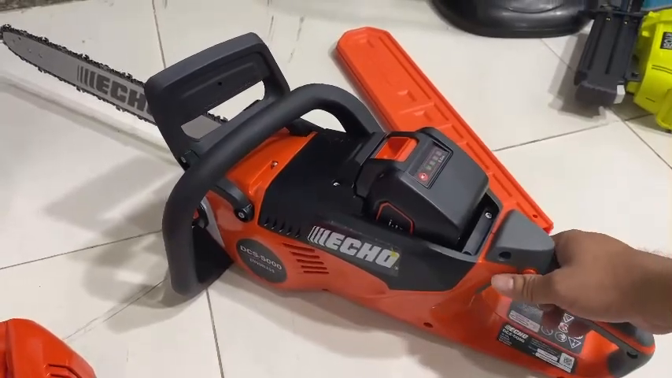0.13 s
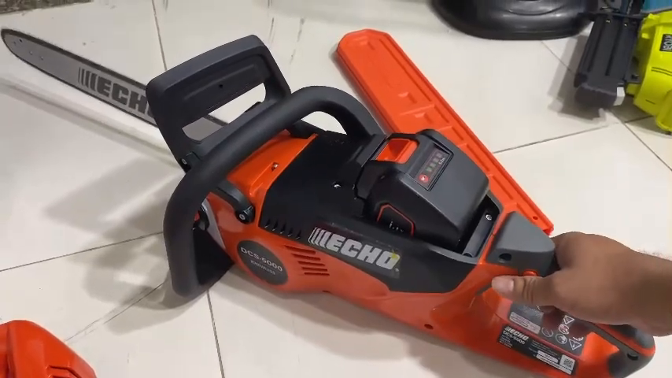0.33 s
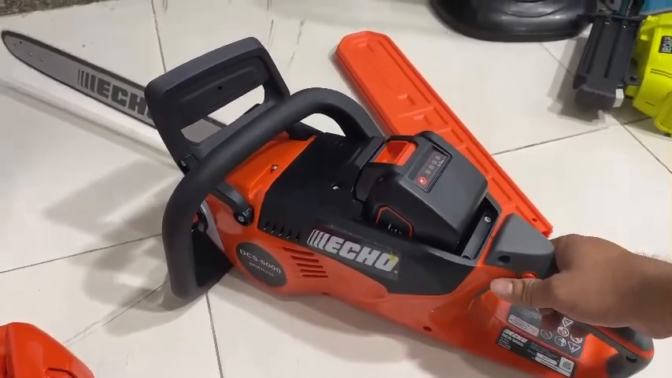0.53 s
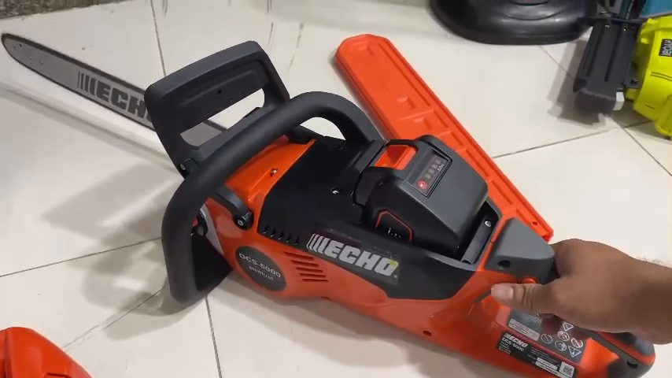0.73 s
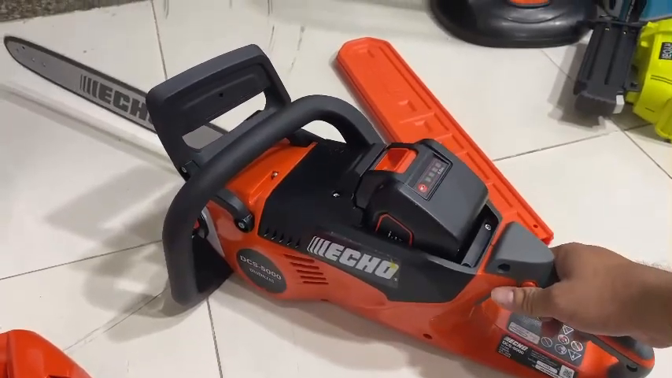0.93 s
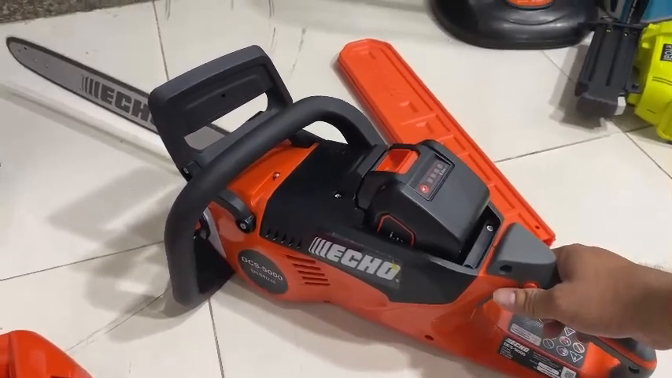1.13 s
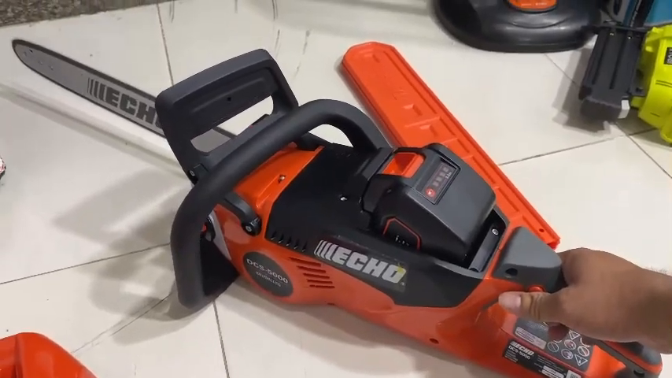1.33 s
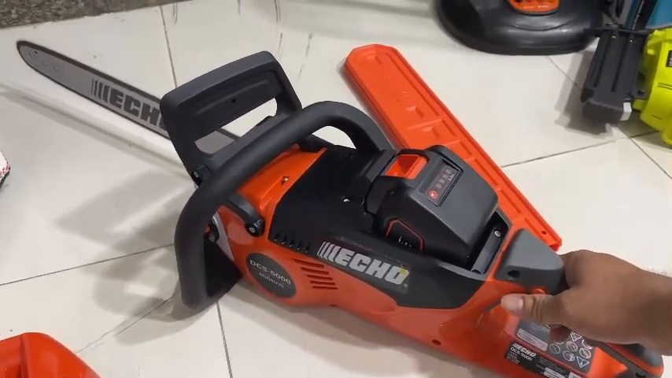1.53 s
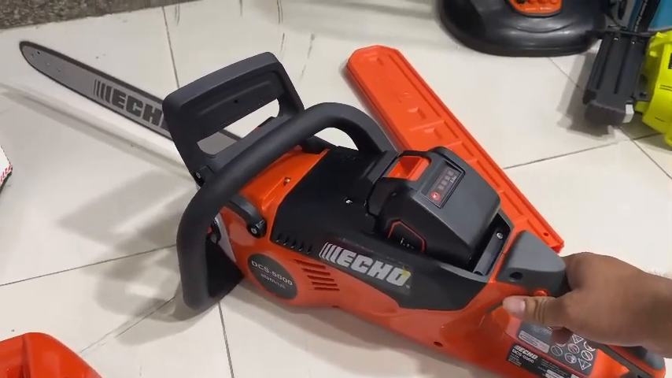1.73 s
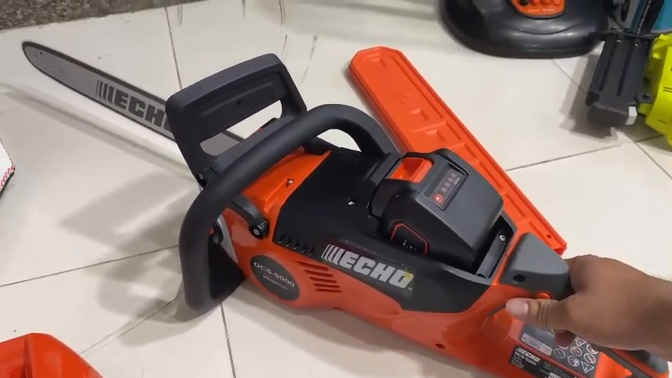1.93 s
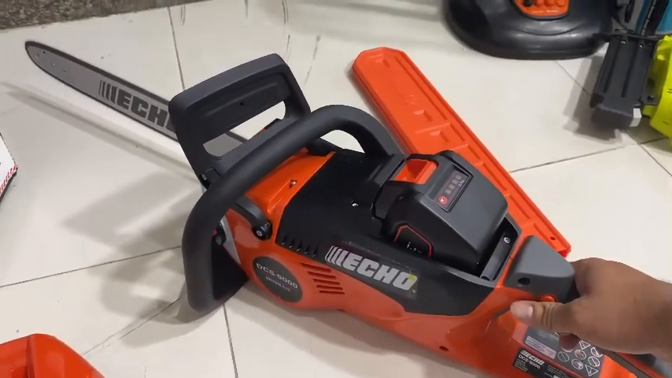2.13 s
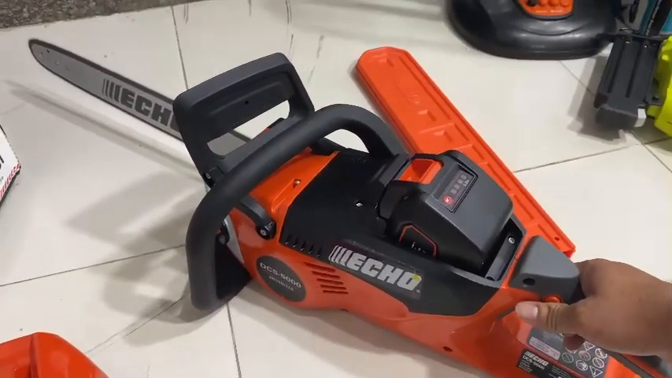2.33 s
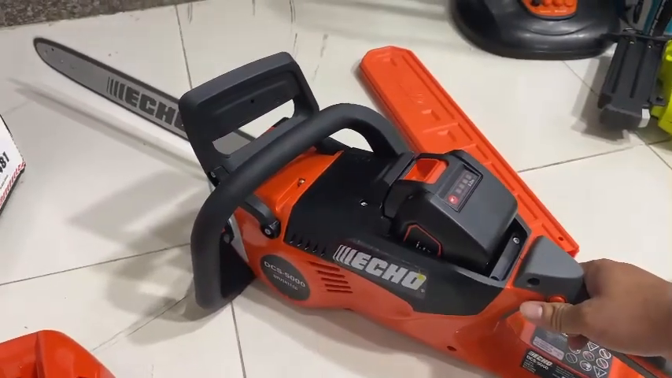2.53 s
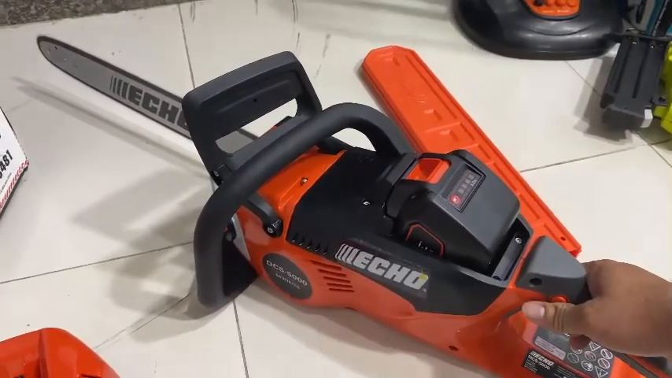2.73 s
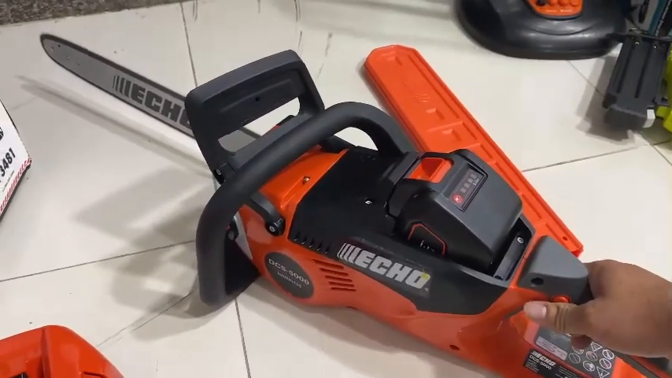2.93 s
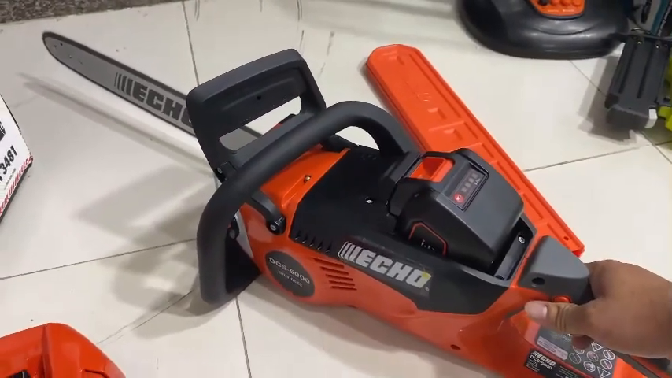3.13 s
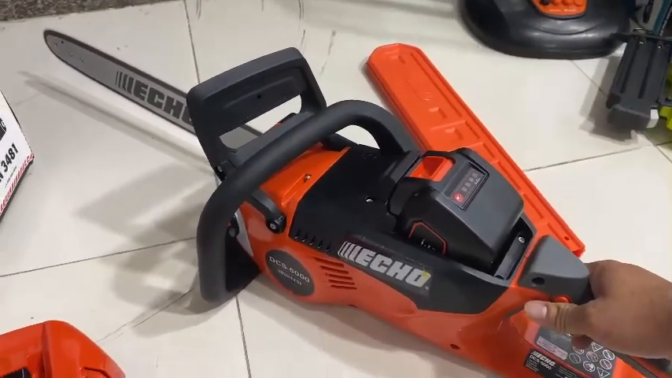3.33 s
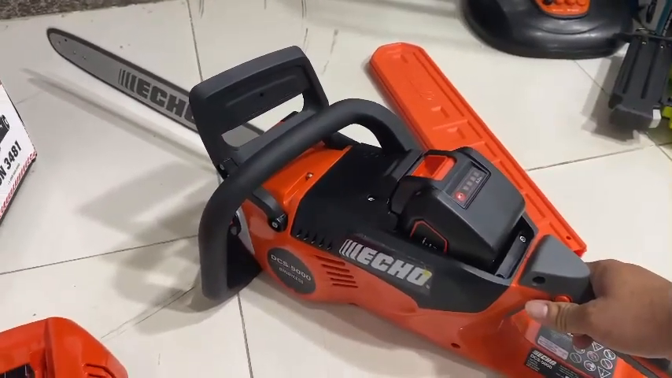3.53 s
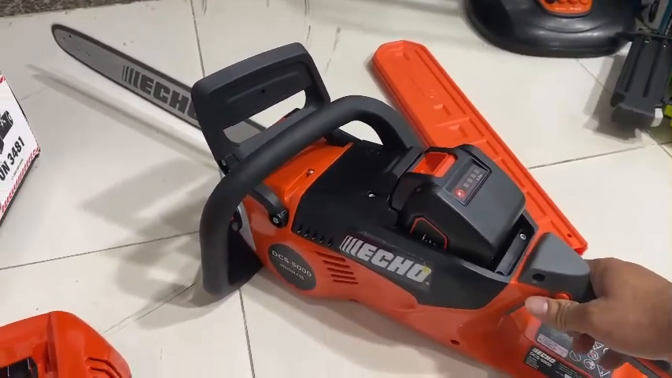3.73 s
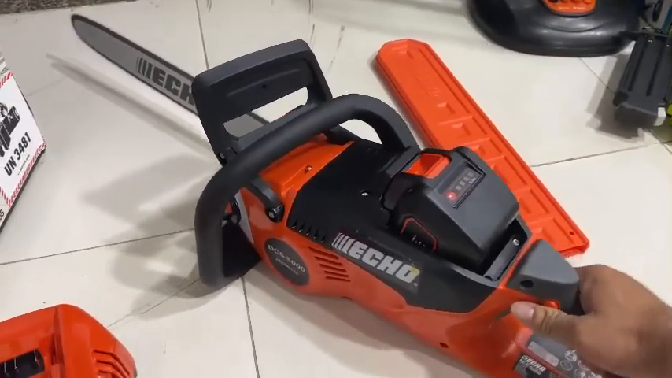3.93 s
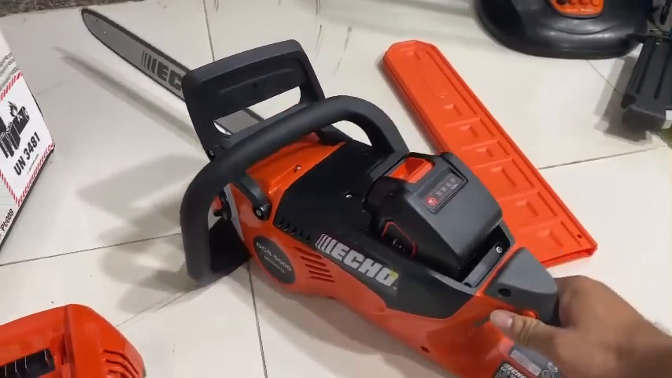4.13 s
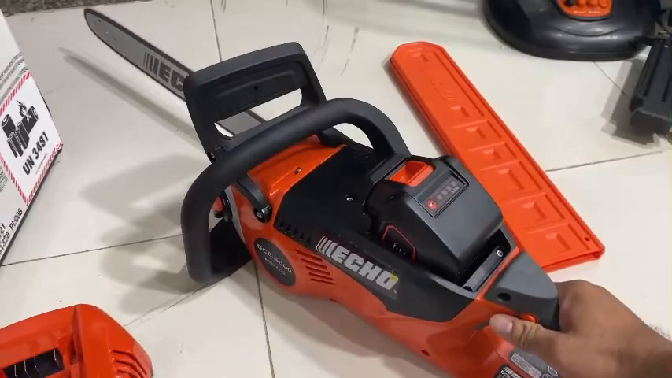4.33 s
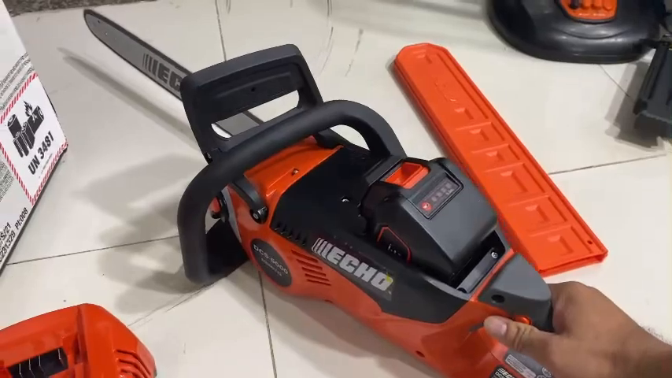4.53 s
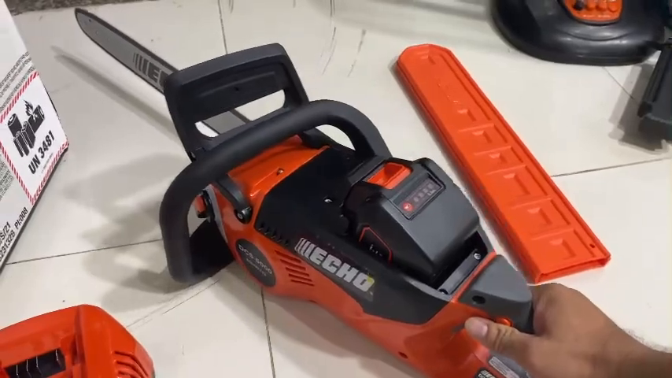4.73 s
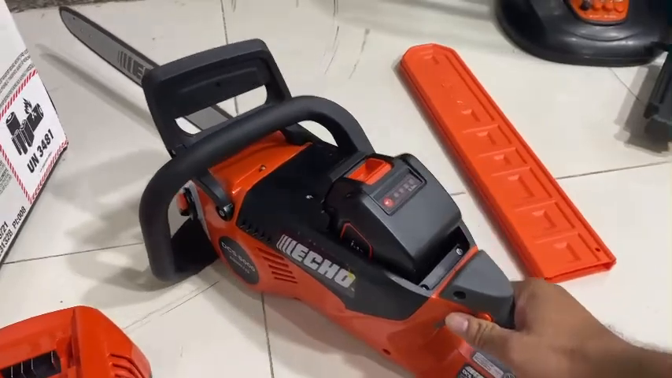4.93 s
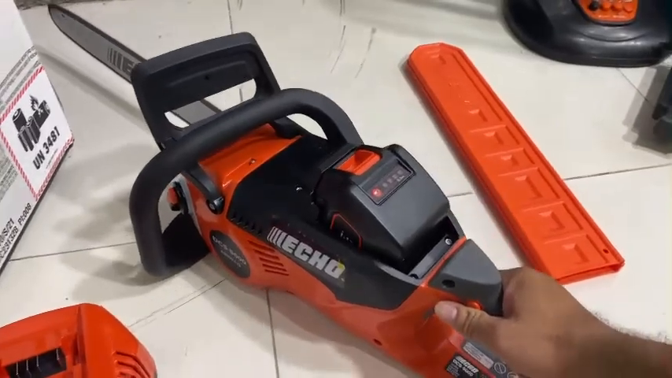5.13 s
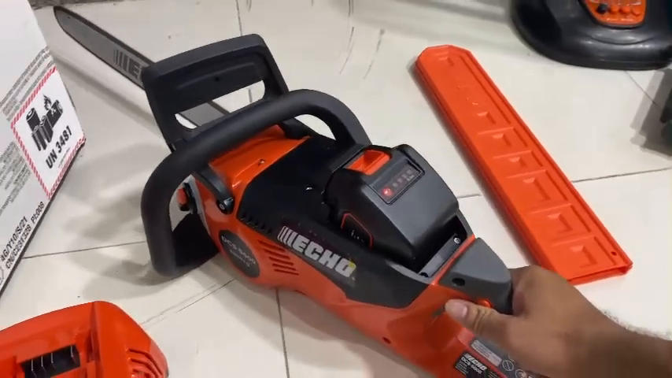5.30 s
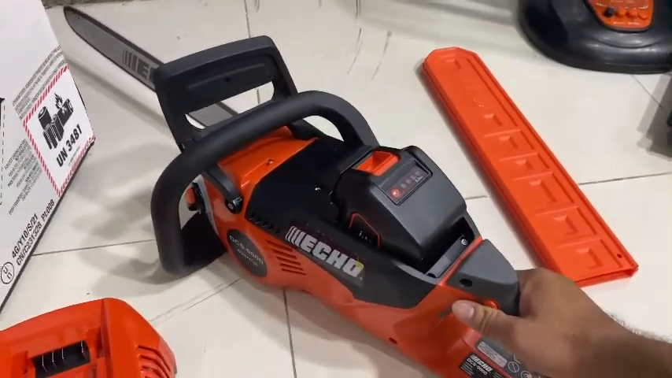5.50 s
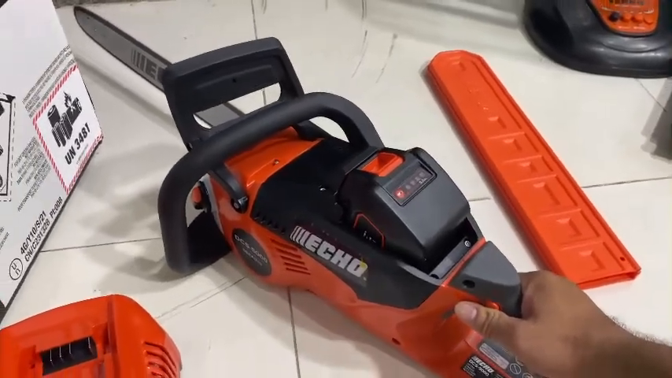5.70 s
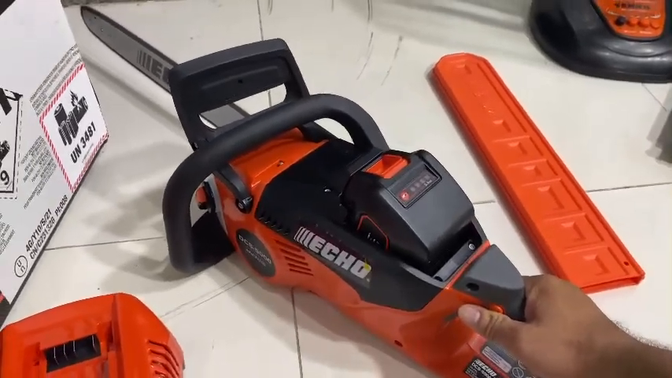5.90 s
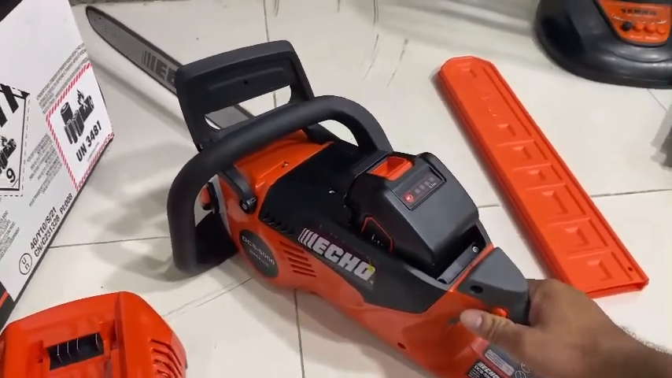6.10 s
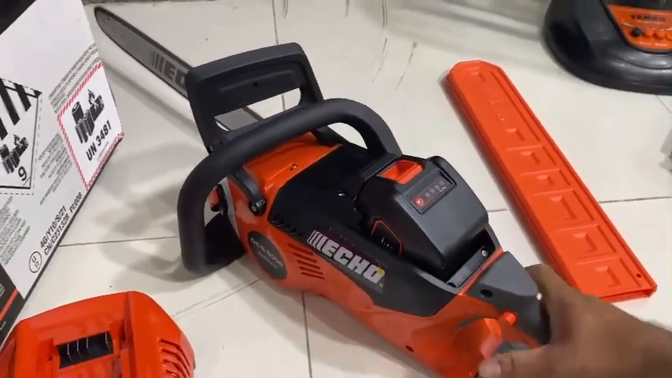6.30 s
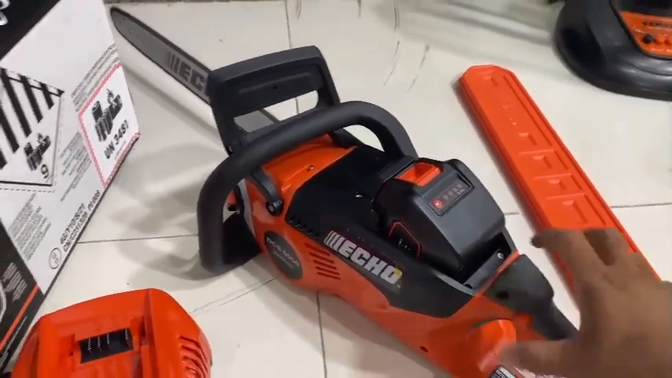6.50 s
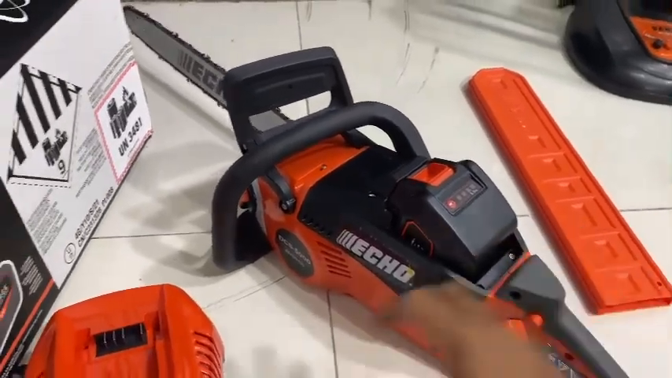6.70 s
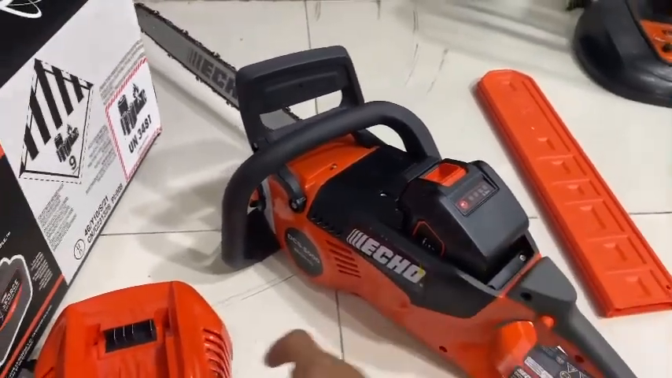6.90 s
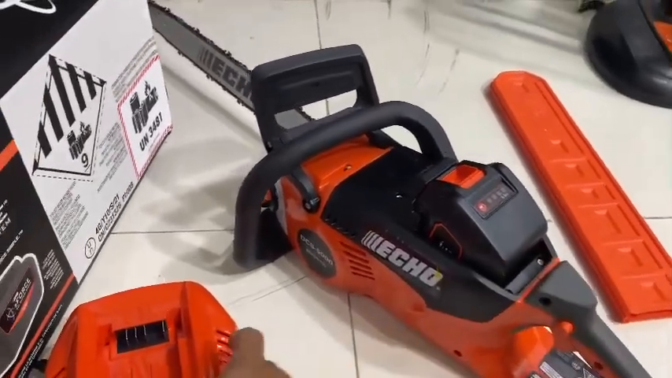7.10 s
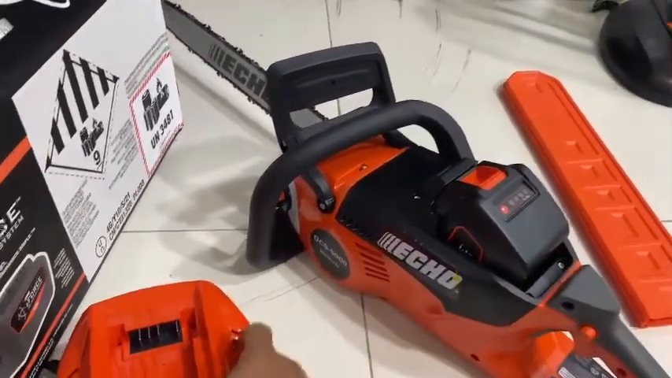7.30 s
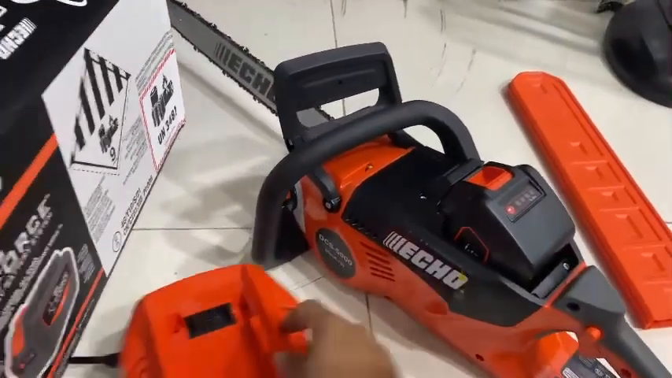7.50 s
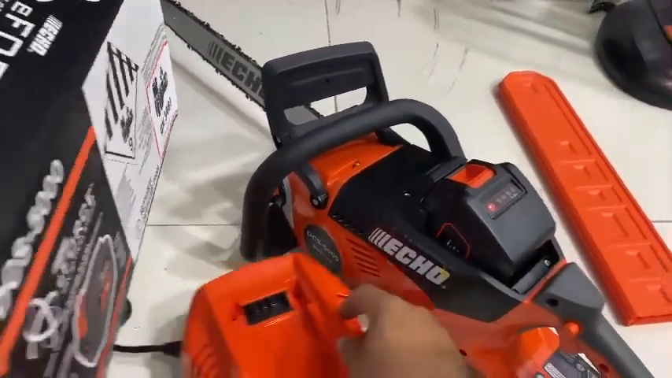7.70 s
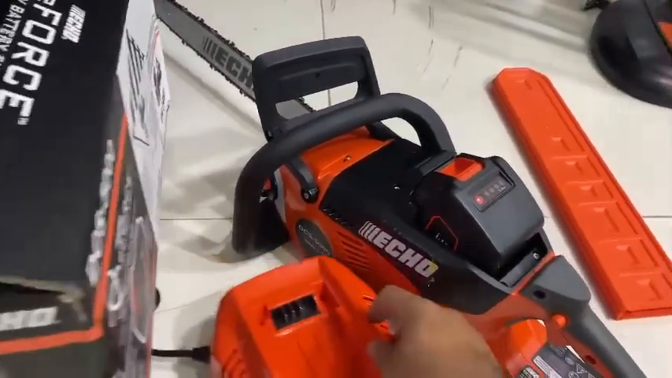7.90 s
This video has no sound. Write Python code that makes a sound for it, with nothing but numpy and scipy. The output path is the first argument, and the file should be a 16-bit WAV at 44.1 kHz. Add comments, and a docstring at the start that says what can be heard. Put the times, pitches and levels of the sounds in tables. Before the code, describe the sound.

Close up in a reflective tiled room, an electric saw motor rises from a click to a hard, buzzing whine near 870 hertz, wrapped in fast chain clatter and steel hiss. It holds without load, its tone colour shifting as the hand-held microphone moves around behind. Then the pitch falls for half a second, a brake cuts it off, the room rings briefly, and a plastic shell slides and thuds on tile.

```python
"""A battery chainsaw on a tiled floor spins up, runs free, coasts and brakes to a stop.
One shaft speed drives it all: sprocket whine and motor tones are sums of sines locked to shaft angle;
chain rattle and hiss are random impacts, and the shell's boom is noise, shaped by resonances.
The trigger clicks at the start; at the end a plastic charger slides and knocks: filtered noise and
decaying modes. A hand-held microphone moves from the saw's side to behind it, over quiet room air."""
import sys
import numpy as np
from scipy import signal
from scipy.fft import rfft, irfft, next_fast_len
from scipy.io import wavfile
from scipy.ndimage import map_coordinates

SR = 44100
rng = np.random.default_rng(int(sys.argv[2]) if len(sys.argv) > 2 else 0)


def to_wav(sig):
    """Store sig (one row per channel, or 1-D mono) as 16-bit WAV at the path in sys.argv[1].

    Samples outside -1..1 are clipped; the rate is SR.
    """
    pcm = np.clip(np.atleast_2d(sig), -1, 1) * 32767
    pcm = np.round(pcm).astype(np.int16)
    wavfile.write(sys.argv[1], SR, pcm.T)  # frames by channels


N = 350683
TIME = np.arange(N) / SR  # [s]


def amp(db):
    """Level to amplitude: 20 dB is a factor of ten."""
    return 10 ** (np.asarray(db) / 20)


def unit(x):
    """Normalisation: x scaled to rms 1."""
    return x / np.sqrt(np.mean(x ** 2) + 1e-20)


def along(points, hz):
    """Interpolation of (frequency [Hz], value) points on a logarithmic frequency axis."""
    point_hz, values = np.transpose(points)
    return np.interp(np.log(hz + 1), np.log(point_hz + 1), values)


def over_time(points):
    """Linear interpolation of (time [s], value) points at every sample."""
    return np.interp(TIME, *np.transpose(points))


def levels(rows):
    """Envelope: (time [s], level [dB]) points as a gain that fades out beyond their ends."""
    times = np.transpose(rows)[0]
    outside = np.abs(TIME - np.clip(TIME, times[0], times[-1]))
    return amp(over_time(rows)) * np.exp(-outside / 0.012)


def wobble(rate):
    """Slow random modulation: a smooth curve through random knots, rate of them a second."""
    knots = rng.standard_normal(int(N * rate / SR) + 4)
    return map_coordinates(knots, [TIME * rate])


def filtered(x, response):
    """Linear filtering: the spectrum of x times a response of frequency."""
    size = next_fast_len(N + SR // 2)
    return irfft(rfft(x, size) * response(np.fft.rfftfreq(size, 1 / SR)), size)[:N]


def coloured(x, spectrum):
    """Spectral shaping: x through a (frequency [Hz], level [dB]) curve, at rms 1."""
    return unit(filtered(x, lambda hz: amp(along(spectrum, hz))))


def noise():
    """White noise: equal power at all frequencies."""
    return rng.standard_normal(N)


def lagged(x, seconds):
    """First-order lag: x approached exponentially with the given time constant."""
    keep = np.exp(-1 / (seconds * SR))
    return signal.lfilter([1 - keep], [1, -keep], x)


def tone(turns, flutter, flutter_rate):
    """Complex modulation: a sine of about rms 1 that flutters in strength and phase."""
    carrier = np.exp(2j * np.pi * (turns + rng.random()))
    modulation = 1 + flutter * (wobble(flutter_rate) + 1j * wobble(flutter_rate))
    return np.sqrt(2) * (carrier * modulation).real


# reverberation of tiles and walls: (frequency [Hz], 60 dB decay time [s])
ROOM_DECAY = [(150, 0.35), (1000, 0.26), (5000, 0.39), (14000, 0.17)]


def room(x):
    """Reverberation: convolution with noise whose decay time depends on frequency."""
    hz, t, bins = signal.stft(rng.standard_normal(SR // 2), SR, nperseg=256)
    decay = amp(-60 * t / along(ROOM_DECAY, hz)[:, None])
    tail = signal.istft(bins * decay, SR, nperseg=256)[1]
    return signal.fftconvolve(x, tail / np.linalg.norm(tail))[:N]


# spectrum of still room air: (frequency [Hz], relative level [dB])
AIR_SPECTRUM = [(15, -34.5), (25, -6), (106, -2), (142, -7), (231, -13), (344, 0), (383, -14.5),
                (1240, -16), (1580, -13), (2780, -25.5), (15000, -42.5)]
# hum lines of a distant appliance: (frequency [Hz], level [dB])
HUM_LINES = [(140.0, -74.5), (279.9, -77), (355.3, -80)]


def background():
    """Stationary noise floor: shaped room air plus faint, steady hum lines."""
    hum = sum(amp(db) * tone(hz * TIME, flutter=.2, flutter_rate=6) for hz, db in HUM_LINES)
    return amp(-65.0) * coloured(noise(), AIR_SPECTRUM) + hum


START_S, RELEASE_S, BRAKE_S = .134, 6.1, 6.595  # ramp, coast and brake begin
FULL_HZ = 145.0  # governed shaft rate
RAMP_HZ_PER_S, COAST_HZ_PER_S = 135, 152
INERTIA_S = .066  # time constant
BRAKING_S = .07  # from the brake's grip to standstill


def shaft_speed():
    """Rotational inertia: turns a second rise, hold and coast with a lag, then the brake grips."""
    driven = np.clip(RAMP_HZ_PER_S * (TIME - START_S), 0, FULL_HZ)
    lost = COAST_HZ_PER_S * np.maximum(TIME - RELEASE_S, 0)
    brake = np.clip(1 - (TIME - BRAKE_S) / BRAKING_S, 0, 1)
    return np.maximum(lagged(driven - lost, INERTIA_S), 0) * brake


def gliding(speed):
    """Departure from steady rotation: 0 at full speed, 1 well below it."""
    return np.clip((FULL_HZ - speed) / 25, 0, 1)


SLACK_S = .205  # the chain has taken up its slack
SETTLE_AT_S, SETTLE_S = 1.46, 0.24  # strain eases from here, with this time constant


def loudness(speed, law):
    """Power law of speed: level rises with its logarithm, plus a strain term that eases."""
    full_db, slope_db, strain_db = law
    strain = np.exp(-np.maximum(TIME - SETTLE_AT_S, 0) / SETTLE_S)
    speed_db = slope_db * np.log10(speed / FULL_HZ + 1e-9)
    return amp(full_db + speed_db + strain_db * strain) * (TIME > SLACK_S)


# link impacts: (level at full speed [dB], slope [dB per tenfold speed], rise under strain [dB])
IMPACT_LAW = (-26.5, 13.7, 3.55)
SLOW_HZ = 19  # below this shaft rate the links barely rattle


def rattle_force(speed):
    """Impact force: the links strike harder with speed and only tap while the chain creeps."""
    return loudness(speed, IMPACT_LAW) * speed / np.hypot(speed, SLOW_HZ)


LINGER_SHARE = .55  # part of the noise power that arrives by way of the room


def lingering(gain, t60):
    """Direct and reverberant power: one part stops at once, the other decays over t60 [s]."""
    reverberant = lagged(gain ** 2, t60 / np.log(1e6))
    return np.sqrt((1 - LINGER_SHARE) * gain ** 2 + LINGER_SHARE * reverberant)


# microphone's move from the saw's side to behind it: (time [s], share [0-1])
VIEW_PATH = [(3.9, 0.07), (4.6, .25), (5.1, 1)]


def behind_saw():
    """Source directivity: the microphone's share of the rear view."""
    return np.clip(over_time(VIEW_PATH), 0, 1)


# cancellation by the tiles' reflection as the microphone passes: (time [s], depth [0-1])
CANCELLATION = [(3.3, 0.02), (4.05, 0.16), (4.5, 0.39), (5, 0.08)]


def shadow_depth():
    """Destructive interference: depth of the cancellation by the floor reflection."""
    return over_time(CANCELLATION)


# change with the microphone's place: (frequency [Hz], in passing [dB], behind the saw [dB])
PLACE_RESPONSE = [(120, 0, 0), (145, -2, -6), (230, -2, -5), (290, -2, 1.5), (370, 0, 3), (435, 6, -3),
                  (579, -0.5, 0), (870, -0.5, 0), (1015, 4.5, 0.5), (1305, 4, -1.5), (1500, 0, 1),
                  (1740, -0.5, -2.5), (2000, 0, 2), (2320, 0.5, -1), (2610, 9.5, 1), (3000, 0, 0.5)]


def place_db(tone_hz):
    """Position-dependent transfer: a tone's change in level as the microphone moves."""
    hz, passing_db, behind_db = np.transpose(PLACE_RESPONSE)
    shadow = shadow_depth()
    passing = shadow / shadow.max()
    return np.interp(tone_hz, hz, passing_db) * passing + np.interp(tone_hz, hz, behind_db) * behind_saw()


def blows(events, modes, crack_t60, crack_hz):
    """Modal impact: each blow on plastic gives a short noise crack and decaying shell modes."""
    out, t = np.zeros(N + SR), np.arange(SR // 3) / SR
    pole = np.exp(-2 * np.pi * crack_hz / SR)
    for start_s, db, crack_db in events:
        ring = np.zeros(len(t))
        for hz, mode_db, t60 in modes:
            decay = amp(mode_db + rng.normal(0, 1.5) - 60 * t / t60)
            ring += decay * np.sin(2 * np.pi * hz * t + rng.normal(0, .6))
        crack = unit(signal.lfilter([1], [1, -pole], rng.standard_normal(len(t))))
        crack *= amp(crack_db - 6.5 - 60 * t / crack_t60)
        # soft contacts: both parts need milliseconds to build up
        sound = .5 * ring * (1 - np.exp(-t / 0.0025)) + crack * (1 - np.exp(-t / 0.0017))
        out[round(start_s * SR):][:len(t)] += amp(db) * sound
    return filtered(out[:N], lambda hz: (1j * hz / (150 + 1j * hz)) ** 2 / (1 + (hz / 8000) ** 4))


# trigger, and chain taking up its slack: (time [s], relative level [dB], relative crack level [dB])
TRIGGER_BLOWS = [(.1515, -29.5, -6), (.159, -33, -21), (.203, -39, 6)]
# modes of the saw's shell: (frequency [Hz], relative level [dB], 60 dB decay time [s])
TRIGGER_RINGING = [(396, -10, .05), (844, 2, 0.052), (946, 12, 0.032), (1040, 2, 0.033), (1810, -4, 0.033),
                   (2850, -23, .03)]


def trigger_clicks():
    """Modal impact: the trigger, then the tightening chain, excite the housing's modes."""
    return blows(TRIGGER_BLOWS, TRIGGER_RINGING, crack_t60=0.027, crack_hz=2200)


TEETH = 6
# whine: (multiple of the tooth rate, relative level [dB], flutter [0-1], change while coasting [dB])
TOOTH_TONES = [(1, -22, .075, -.5), (2, -35.5, .22, -4.5), (3, -40, .26, 5)]
# the housing's radiation of the whine: (frequency [Hz], relative level [dB])
WHINE_RADIATION = [(180, -42), (330, -12), (440, -5), (510, -18.5), (590, -9), (650, -6), (730, -20),
                   (800, -5.5), (870, -1), (950, -3.5), (1040, 1), (1170, 1), (1290, -10), (1480, -1),
                   (1560, -7), (1750, -7.5), (2000, -7), (2600, -9)]
# tooth tone as the microphone drifts through standing waves: (time [s], change in level [dB])
TOOTH_SWELL = [(1.1, -2), (1.38, 1.5), (1.7, -0.5), (3.5, -0.6), (3.85, 1.5), (4.2, 0.1), (4.75, 0.1),
               (5, 1.7), (5.4, -2.5), (6.05, -4), (6.3, 1.5)]
# whine: (level at full speed [dB], slope [dB per tenfold speed], rise under strain [dB])
SPROCKET_LAW = (0, 20.7, 3.1)


def sprocket(speed, turns):
    """Tooth-meshing harmonics: teeth catch the links and tones flare at housing resonances."""
    coasting = gliding(speed) * (TIME > RELEASE_S)
    out = np.zeros(N)
    for multiple, db, flutter, coast_db in TOOTH_TONES:
        order = TEETH * round(multiple)
        body_db = along(WHINE_RADIATION, order * speed) - along(WHINE_RADIATION, order * FULL_HZ)
        swell_db = over_time(TOOTH_SWELL) if order == TEETH else 1.1 * wobble(5)
        gain = amp(db + body_db + place_db(order * speed) + swell_db + coast_db * coasting)
        out += gain * tone(order * turns, flutter, flutter_rate=47)
    return out * loudness(speed, SPROCKET_LAW)


# the housing's answer to links and shaft tones: (frequency [Hz], relative level [dB])
HOUSING_RESPONSE = [(30, -42.5), (65, -17), (190, -19.5), (270, -10), (360, -1.5), (500, -4), (740, -2),
                    (930, 7), (1200, 2), (2100, 1.5), (2550, 2.5), (2950, -6), (3800, -10), (6000, -20.5)]
# weaker tones of motor and chain: (multiple of the shaft rate, relative level [dB])
SHAFT_ORDERS = [(2.0, -48), (3.0, -43), (4.0, -47), (5.0, -48), (5.5, -46), (6.5, -45), (7.0, -39),
                (7.5, -47), (8.0, -48), (9.0, -41), (9.5, -48), (10.0, -45), (10.5, -50), (11.0, -47),
                (11.5, -44), (13.0, -50), (13.5, -47), (15.0, -45), (15.5, -49), (16.0, -40), (19.0, -47),
                (21.0, -48), (24.0, -49), (30.0, -48), (31.0, -51), (32.0, -46), (34.5, -51)]
# rotor drone: (level at full speed [dB], slope [dB per tenfold speed], rise under strain [dB])
UNBALANCE_LAW = (-57, 5, 4)
# the floor's transmission of the rotor's unbalance: (frequency [Hz], level [dB])
FLOOR_RESPONSE = [(30, -30), (62, -6), (85, 5), (120, 4), (145, 0.5)]
SLACK_DB = 2.5  # off full speed the chain runs slack and the shaft tones come out


def motor(speed, turns):
    """Order spectrum: shaft harmonics sweep the housing's resonances; rotor unbalance drones."""
    out = np.zeros(N)
    for order, db in SHAFT_ORDERS:
        body_db = along(HOUSING_RESPONSE, order * speed) - along(HOUSING_RESPONSE, order * FULL_HZ)
        sharpness = (speed / FULL_HZ) ** (order / 11)  # high orders need fast, hard contacts
        drift_db = 2.1 * wobble(2.5)  # each tone drifts slowly and randomly in level
        gain = sharpness * amp(db + body_db + place_db(order * speed) + drift_db)
        out += gain * np.sin(2 * np.pi * (order * turns + rng.random()) + 0.2 * wobble(30))
    orders = amp(0.87 + SLACK_DB * gliding(speed)) * out * unit(rattle_force(speed))
    drone_gain = loudness(speed, UNBALANCE_LAW) * amp(along(FLOOR_RESPONSE, speed) + place_db(speed))
    return orders + drone_gain * tone(turns, flutter=.12, flutter_rate=12)


def link_hits(speed, turns, per_turn, scatter_db, turn_depth, tooth_depth):
    """Random impact train: links strike the bar, harder once a turn and at every tooth."""
    pace = speed + 10  # the offset keeps the density above zero at rest
    struck = rng.random(N) < per_turn * pace / SR
    sizes = np.sign(noise()) * amp(scatter_db * rng.uniform(-0.89, 1, N))
    hits = unit(struck * sizes / np.sqrt(pace))
    beat = 1 + turn_depth * np.cos(2 * np.pi * turns) + tooth_depth * np.cos(2 * np.pi * TEETH * turns)
    return (hits + .5 * noise()) * beat


def delayed_copies(x, count):
    """Comb filtering: a few weak copies at random short delays ripple the spectrum finely."""
    delays = rng.integers(SR // 900, SR // 130, count)  # [samples]
    return x + .17 * sum(np.pad(x, (d, 0))[:N] for d in delays)


# the bar's ringing: (frequency [Hz], width [Hz], relative level [dB])
BAR_RESONANCES = [(4640, 35, -1), (5880, 40, -7), (6336, 30, 0), (10487, 45, -5)]


def bar_ring(hits):
    """Modal resonance: the impacts drive narrow resonances of the steel bar."""
    def response(hz):
        return sum(amp(db) * 1j * hz * width / (centre ** 2 - hz ** 2 + 1j * hz * width)
                   for centre, width, db in BAR_RESONANCES)
    return unit(filtered(hits, response))


# steel sliding in the bar, from the side and from behind: (frequency [Hz], relative level [dB])
SIDE_SPECTRUM = [(1800, -32), (3100, -3.5), (3750, -7.5), (4300, -3.5), (4700, 3), (5500, -3.5),
                 (6200, 1.5), (7300, 0), (8250, -9.5), (9500, 0), (10600, 0), (12300, -4), (14300, -12.5),
                 (16000, -10.5)]
REAR_SPECTRUM = [(1800, -38), (3100, -7.5), (3750, -5.5), (4300, 0.5), (4900, 4), (5500, 3), (6200, 4.5),
                 (7300, 1), (8250, -7.5), (9500, 0), (10600, 2), (12300, -4.5), (14300, -15), (16000, -9)]
# groove hiss: (level at full speed [dB], slope [dB per tenfold speed], rise under strain [dB])
GROOVE_LAW = (-25, 24, 3.1)


def chain(speed, turns):
    """Impact and friction noise: links rattle the housing, hiss in the groove and ring the bar."""
    rattle_gain = lingering(rattle_force(speed), t60=0.28)
    hiss_gain = lingering(loudness(speed, GROOVE_LAW), t60=.34)
    hits = link_hits(speed, turns, per_turn=42, scatter_db=3.0, turn_depth=0.082, tooth_depth=0.075)
    whip = amp(.35 * wobble(28))  # the loose chain whips in its groove
    side, rear = delayed_copies(hits, count=6), delayed_copies(hits, count=6)
    behind = behind_saw()
    housing = coloured((1 - behind) * side + behind * rear, HOUSING_RESPONSE)
    rattle = amp(-1.5) * rattle_gain * housing
    hiss = (1 - behind) * coloured(side, SIDE_SPECTRUM) + behind * coloured(rear, REAR_SPECTRUM)
    steel = amp(-0.7) * hiss + amp(-21.5) * bar_ring(hits)
    # the floor reflection cancels part of the upper middle: (frequency [Hz], share [0-1])
    notches = [(3300, 0), (3800, 0.48), (4600, 0.92), (5000, 0.45), (5450, 0.93), (6100, 0.14)]
    steel -= shadow_depth() * filtered(steel, lambda hz: along(notches, hz))
    return whip * (rattle + hiss_gain * steel)


# shell noise: (level at full speed [dB], slope [dB per tenfold speed], rise under strain [dB])
SHELL_NOISE_LAW = (-46, 6, 2)
BOOM_HZ, BOOM_WIDTH_HZ, BOOM_DB = 440, 55, 8
JOLT_DB, JOLT_S = -36, 0.018  # the brake's jolt: peak gain; delay and width


def shell(speed, turns):
    """Resonant excitation: noise booms as tooth rate or octave meets a mode, and at the brake's jolt."""
    in_tune = sum(np.exp(-((k * TEETH * speed - BOOM_HZ) / BOOM_WIDTH_HZ) ** 2) for k in (1, 2))
    jolt = amp(JOLT_DB) * np.exp(-((TIME - BRAKE_S - JOLT_S) / JOLT_S) ** 2)
    driven = loudness(speed, SHELL_NOISE_LAW) * amp(BOOM_DB * in_tune)
    gain = lingering(driven + jolt, t60=.2)
    slaps = noise() * (1 + 0.33 * np.cos(2 * np.pi * turns))
    mode = [(150, -40.5), (270, -19), (345, 4.0), (420, 0.0), (520, -5.5), (900, -38)]
    return gain * coloured(slaps, mode)


# soft handling bumps: (time [s], level [dB], Gaussian width [s])
HAND_BUMPS = [(3.201, -47, 0.037), (3.93, -45, .045), (7.235, -54, 0.02), (7.264, -47.5, 0.0088),
              (7.44, -51, 0.025), (7.55, -56, .05), (7.91, -65, .03)]


def hand_bumps():
    """Soft contact: long, smooth pulses of low-frequency noise, the dull bumps of a hand."""
    swell = sum(amp(db) * np.exp(-.5 * ((TIME - s) / width) ** 2) for s, db, width in HAND_BUMPS)
    dull = [(20, -16), (50, 0.5), (110, -1.0), (220, -17.0), (700, -66.5)]
    return swell * coloured(noise(), dull)


# strength of the charger's slide: (time [s], level [dB])
SLIDE_LEVEL = [(7.1, -96), (7.29, -68), (7.33, -62.5), (7.55, -63), (7.65, -57), (7.8, -66), (7.95, -64.5)]
# scraping on the tiles: (frequency [Hz], relative level [dB])
SCRAPE_SPECTRUM = [(200, 1), (450, 7), (1200, -3), (3000, -4.5), (6700, -3), (8200, -20), (10500, -8),
                   (13000, -24), (16000, -45)]


def charger_slide():
    """Sliding friction: the charger's feet scrape the tiles as shaped noise."""
    return levels(SLIDE_LEVEL) * coloured(noise(), SCRAPE_SPECTRUM)


# charger striking the tiles: (time [s], relative level [dB], relative crack level [dB])
CHARGER_BLOWS = [(7.241, -39, 0), (7.499, -28, -15), (7.523, -25, -19), (7.688, -15.5, -8), (7.7, -18, -7),
                 (7.712, -36, -12), (7.758, -18, -8.5), (7.782, -25.5, -22)]
# modes of its plastic shell: (frequency [Hz], relative level [dB], 60 dB decay time [s])
CHARGER_RINGING = [(343, -10, 0.11), (404, -1, 0.066), (443, 5, 0.056), (503, 1.5, 0.073),
                   (560, -11, 0.075), (900, -12.5, 0.066), (1106, -11.5, 0.052), (1480, -16, .04),
                   (2030, -16, 0.046), (3230, -25, .03)]


def charger_knocks():
    """Modal impact: knocks on the tiles excite the charger's shell."""
    return blows(CHARGER_BLOWS, CHARGER_RINGING, crack_t60=.045, crack_hz=1800)


def scene():
    """Superposition: one shaft drives every running sound of the saw; both channels are alike."""
    speed = shaft_speed()
    turns = np.cumsum(speed * (1 + 0.000593 * wobble(14))) / SR
    tones = sprocket(speed, turns) + motor(speed, turns)
    # while the pitch glides, the room's answer lags behind it as a smear
    smear = .36 * room(tones * gliding(speed))
    saw = tones + smear + chain(speed, turns) + shell(speed, turns)
    taps = trigger_clicks() + charger_knocks()
    reverberant_taps = amp(-8.5) * room(taps)
    mono = background() + saw + taps + reverberant_taps + hand_bumps() + charger_slide()
    return np.array([mono, mono])


TOP_HZ = 15900  # band limit


def record(dry):
    """Band limiting: deep rumble is shed, a narrow treble band notched and the top cut off."""
    def response(hz):
        low_cut = hz ** 2 / np.sqrt(hz ** 4 + 44 ** 4)
        notch = 1 - np.exp(-((hz - 13450) / 560) ** 6)
        top = 1 / (1 + np.exp(np.minimum((hz - TOP_HZ) / 40, 50)))
        return low_cut * notch * top
    return np.array([filtered(channel, response) for channel in dry])


dry = scene()
out = record(dry)
to_wav(out)
```